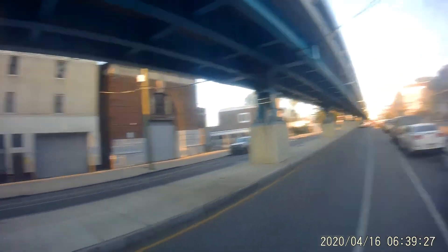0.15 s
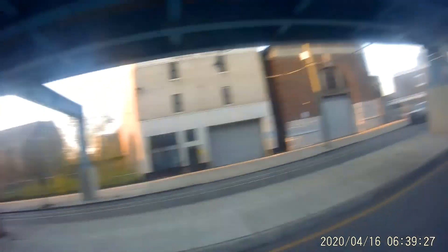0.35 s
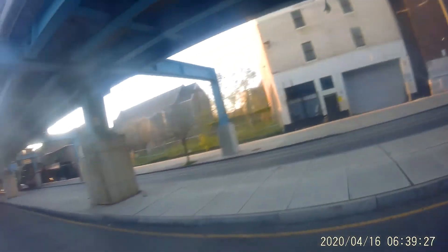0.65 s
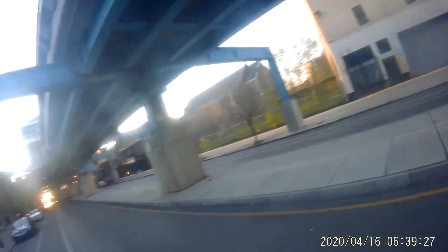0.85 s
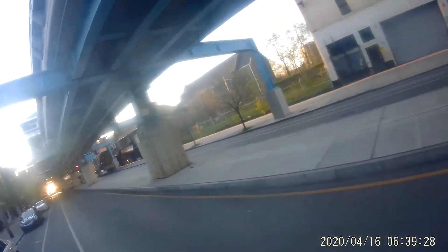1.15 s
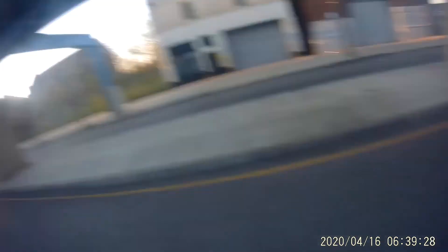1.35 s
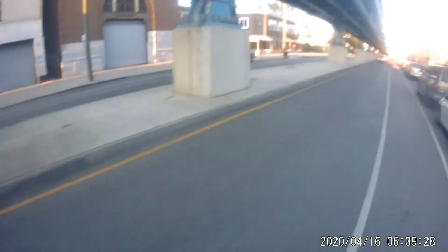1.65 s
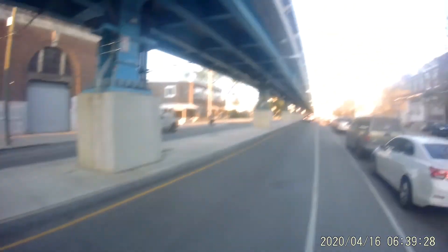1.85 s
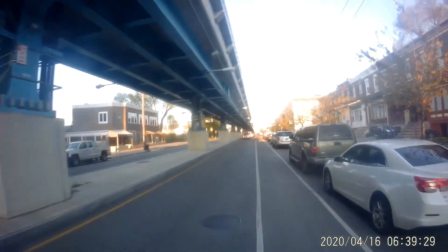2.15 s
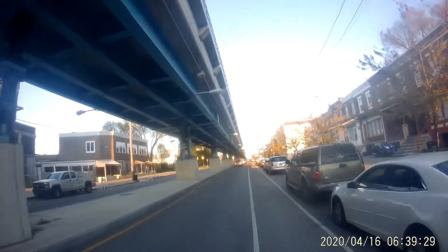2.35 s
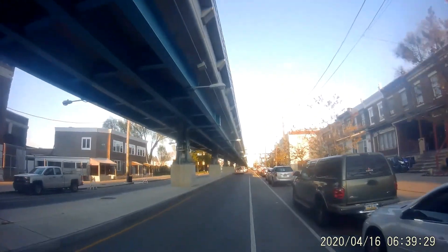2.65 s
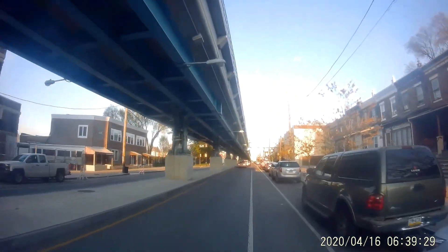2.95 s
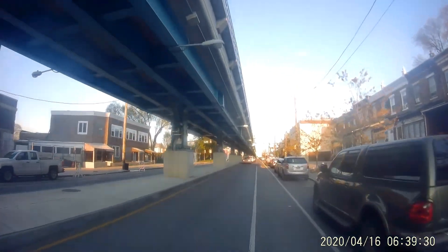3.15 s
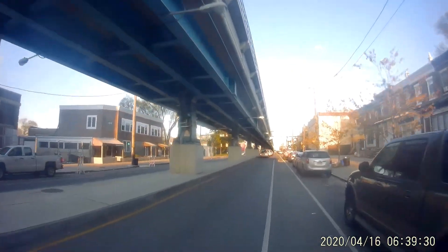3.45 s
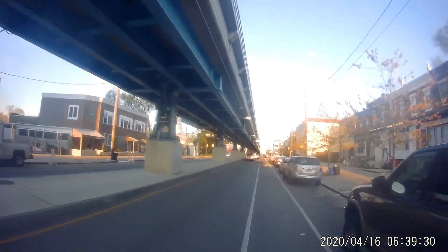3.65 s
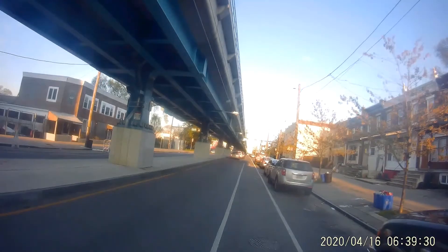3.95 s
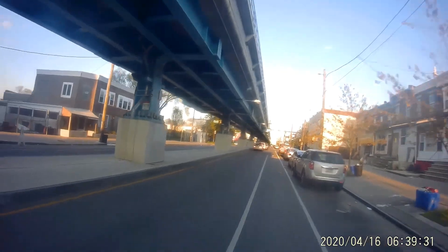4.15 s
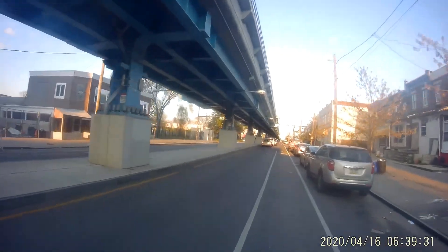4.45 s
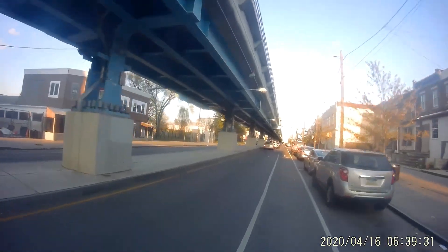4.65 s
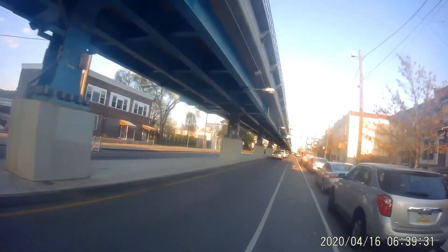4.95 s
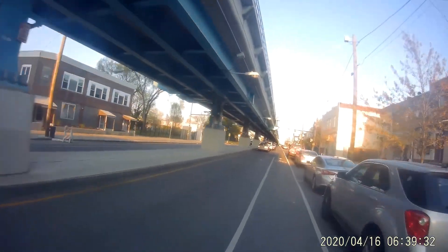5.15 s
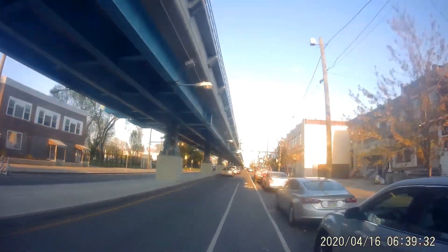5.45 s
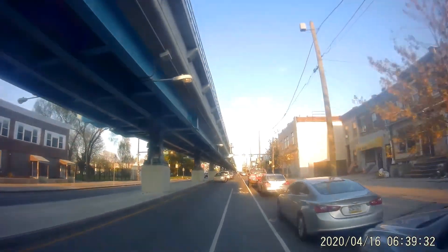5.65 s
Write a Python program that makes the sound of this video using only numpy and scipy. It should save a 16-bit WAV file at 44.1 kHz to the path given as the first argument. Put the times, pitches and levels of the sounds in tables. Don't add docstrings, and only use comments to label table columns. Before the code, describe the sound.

A helmet camera close to a motorized bicycle catches wind buffeting and tyre noise, then a small engine quickly swelling up. Its slow slapping beats quicken to a metallic, raspy drone with fin rattle and hiss. One short thump comes halfway, followed by uneven tugs and thin high chirps; then it speeds up, eases briefly and surges again on the open street. The treble is gritty and occasionally drops out.

```python
import sys
import numpy as np
from scipy import signal
from scipy.fft import rfft, irfft, next_fast_len
from scipy.io import wavfile
from scipy.ndimage import uniform_filter1d, map_coordinates

SR = 44100
rng = np.random.default_rng(int(sys.argv[2]) if len(sys.argv) > 2 else 0)


def invert_db(level):
    return 10 ** (np.asarray(level, dtype=float) / 20)


def unload_wav(signal):
    wavfile.write(
        sys.argv[1],
        SR,
        np.round(np.clip(np.atleast_2d(signal).T, -1, 1) * 32767).astype(np.int16),
    )


N = 255780
T = np.arange(N) / SR
CRUISE_HZ = 43.7

# time_s, turns_per_s
CRANK = [(0.0, 27.01), (0.5, 32.19), (0.64, 29.73), (0.71, 29.29), (1.25, 32.95), (1.38, 34.87),
         (1.86, 40.02), (2.52, 42.26), (2.84, 41.84), (3.08, 44.56), (3.46, 45.44), (3.77, 49.56),
         (4.09, 50.59), (4.62, 56.18), (4.86, 54.42), (5.12, 56.89), (5.31, 55.07), (5.8, 58.34)]
# pitch_hz, width_hz, level_db
PIPE_RINGING = [(775, 167, -4), (1001, 79, -4.5), (1250, 175, -5.5), (1610, 64, -1), (1667, 130, -4.5),
                (2043, 110, -10)]
# pitch_hz, width_hz, level_db
UPPER_FINS = [(4400, 810, 0), (5320, 600, -3.5)]
FADE_IN = 0.1837, 0.3747, -27.5, -12.5, -18
# time_s, half_length_s, lowest_lost_hz
DROPOUTS = [(0.233, 0.0097, 3420), (.359, 0.0049, 5000), (0.783, 0.004, 7000), (0.807, 0.006, 5060),
            (.999, 0.0045, 5470), (1.085, 0.0058, 4800), (1.141, 0.018, 4070), (2.05, 0.0057, 5500),
            (2.664, 0.0058, 4500), (3.535, 0.0049, 4000), (4.284, 0.0064, 5400), (4.563, 0.0045, 6000),
            (4.673, 0.0059, 6850), (5.194, 0.017, 5220)]


def unit(x):
    return x / np.sqrt(np.mean(x ** 2) + 1e-20)


def curves(rows):
    s, *cols = np.transpose(rows)
    return [np.interp(T, s, c) for c in cols]


def bump(at_s, half_s, power=2):
    return np.exp(-((T - at_s) / half_s) ** power)


def steady(x, span):
    return x / np.sqrt(np.abs(uniform_filter1d(x ** 2, int(span * SR))) + 1e-12)


def wobble(rate):
    return map_coordinates(rng.standard_normal(int(N * rate / SR) + 4), [T * rate])


def later(x, s):
    return np.pad(x, (round(s * SR), 0))[:N]


def filtered(x, response):
    m = next_fast_len(N + 8192)
    return irfft(rfft(x, m) * response(np.fft.rfftfreq(m, 1 / SR)), m)[:N]


def resonance(f, centre_hz, width_hz):
    damping = 1j * f * width_hz
    return damping / (centre_hz * centre_hz - f * f + damping)


def body(modes):
    return lambda f: sum((-1) ** k * invert_db(db) * resonance(f, c, w) for k, (c, w, db) in enumerate(modes))


def resonant(x, modes, lo_hz, hi_hz):
    edges = signal.butter(4, [lo_hz, hi_hz], "bandpass", fs=SR, output="sos")
    return unit(signal.sosfilt(edges, filtered(x, body(modes))))


def coloured(spectrum):
    hz, db = np.transpose(spectrum)
    return unit(filtered(rng.standard_normal(N), lambda f: invert_db(np.interp(np.log(f + 1), np.log(hz), db))))


def burst(turns, db, rise, decay, scatter_db):
    whole = np.floor(turns).astype(int)
    size = invert_db(db + scatter_db * rng.standard_normal(whole.max() + 2)[whole])
    since = (turns - whole) / curves(CRANK)[0]
    return 1 + size * (1 - np.exp(-since / rise)) * np.exp(-since / decay)


def blows(turns, delay, jitter, scatter_db):
    at = np.flatnonzero(np.diff(np.floor(turns)) > 0)
    chance = rng.standard_normal((len(at), 2))
    where = np.clip(at + SR * (delay + jitter * chance[:, 0]), 0, N - 1).astype(int)
    return unit(np.bincount(where, invert_db(scatter_db * chance[:, 1]), N))


def knocks(events, modes, lo_hz, hi_hz, decay, over_db):
    first_blow = 50
    s, db = np.transpose(events)
    t = np.arange(300) / SR
    spray = unit(rng.standard_normal((len(s), len(t))) * np.exp(-t / decay)) - first_blow * (t == 0)
    where = (s[:, None] * SR).astype(int) + np.arange(len(t))
    struck = np.bincount(where.ravel(), (spray * invert_db(db)[:, None]).ravel(), N)
    rung = resonant(struck, modes, lo_hz, hi_hz)
    return rung / np.abs(rung).max() * invert_db(db.max() + over_db)


def wind(shut):
    # pitch_hz, level_db_per_hz
    buffet_colour = [(4, -23), (14, 7.5), (35, 1), (70, -4), (130, -51), (300, -49)]
    # pitch_hz, level_db_per_hz
    road_colour = [(50, -22), (90, 7), (150, 1.5), (250, -2), (600, -1), (1300, -21), (2500, -27.5),
                   (4000, -38.5), (15000, -32)]
    # time_s, level_db, half_length_s
    gusts = [
        (0.493, -4, 0.16),
        (1.117, 2, 0.33),
        (2.35, 0, 0.18),
        (2.89, 7.5, 0.071),
        (4.71, 7, 0.053),
        (5.042, 5.5, 0.075),
        (5.8, 3, 0.1),
    ]
    *_, buffet_from_db, road_from_db = FADE_IN
    buffet_db = -46.5 + sum(db * bump(s, half) for s, db, half in gusts)
    road_db = -48 + 5 * np.log2(curves(CRANK)[0] / CRUISE_HZ)
    buffet = invert_db(buffet_db + buffet_from_db * shut + 1.1 * wobble(8.4)) * coloured(buffet_colour)
    road = invert_db(road_db + road_from_db * shut + 2.6 * wobble(13)) * coloured(road_colour)
    return buffet + road


def laws(speed, throttle):
    # resting_db, full_throttle_db, lugging_db, db_per_octave_of_speed
    part_laws = [(-6.5, -3.5, -1, -0.5), (-22, 9, 1.1, 5.6), (-33.5, 4.5, 3, -1.7), (-30, 18, 24, -3.5),
                 (-14.5, 6.5, -9.5, -0.2), (-2.5, 13, 7, 0.5), (8, -21, 1, 11), (-8, 0, 1, 0.5),
                 (-10, 2.5, -6.5, -4.8), (-18, 13, -8, -4), (-26, 0, 14, -20), (-18, 12, -6, 0),
                 (0, -3, 4.5, 0)]
    lugs_below_hz, lug_fade_hz = 38.5, 4.4
    lugging = np.clip((lugs_below_hz - speed) / lug_fade_hz, 0, 1)
    return np.array(part_laws) @ [np.ones(N), throttle, lugging, np.log2(speed / CRUISE_HZ)]


def exhaust(firing, ring_db):
    # pitch_hz, width_hz, level_db
    chamber = [(406, 200, 0)]
    # pitch_hz, width_hz, level_db
    tail_mode = [(461, 45, 0)]

    def swell(f):
        return -np.abs(body(chamber)(f)) / (1 + (284 / (f + 1)) ** 16) / (1 + (f / 560) ** 12)

    puffs = later(firing, .0042)
    gas = puffs + .55 * rng.standard_normal(N)
    ring = unit(filtered(gas, lambda f: -np.abs(body(tail_mode)(f)) ** 2))
    thud = unit(filtered(puffs + .27 * rng.standard_normal(N), swell))
    return thud + invert_db(ring_db) * ring


def casing(port, firing, flare_db, edge_db, bells_db, knock_db):
    # pitch_hz, width_hz, level_db
    pipe_modes = [(788, 148, 0.5), (1322, 255, 2), (1995, 350, -7.5)]
    # pitch_hz, width_hz, level_db
    edge_modes = [(2247, 100, 7), (2710, 250, -10)]
    # pitch_hz, width_hz, level_db
    bell_modes = [
        (1270, 110, 0),
        (2075, 120, 0),
        (1512, 80, 0),
        (1345, 100, 0),
    ]
    round_trip_s, echo_db = .00395, -4.5
    echoes = sum(invert_db(k * echo_db) * later(firing, .0013 + k * round_trip_s) for k in range(4))
    blow = -resonant(echoes, pipe_modes, lo_hz=603, hi_hz=2350)
    flare = burst(port - .05, flare_db, rise=.001, decay=0.0022, scatter_db=5.5)
    drive = unit(flare * rng.standard_normal(N))
    edge = resonant(drive, edge_modes, lo_hz=2200, hi_hz=3050)
    bark = resonant(drive, PIPE_RINGING, lo_hz=618, hi_hz=2260)
    struck = drive - .8 * later(firing, .0013)
    bells = sum(invert_db(db) * unit(filtered(struck, lambda f: body([bell])(f) ** 2))
                for db, bell in zip(bells_db, bell_modes))
    return bark + invert_db(knock_db) * blow + invert_db(edge_db) * edge + bells


def fin_rattle(slap, rasp_db):
    # pitch_hz, width_hz, level_db
    fin_modes = [(3090, 360, 0), (3378, 102, 7.5), (3710, 286, 3.5), (4800, 130, 1.5), (5025, 530, -7)]
    buzz = resonant(slap * rng.standard_normal(N), fin_modes, lo_hz=2630, hi_hz=6560)
    rasp = resonant(slap * rng.standard_normal(N), UPPER_FINS, lo_hz=3800, hi_hz=6630)
    return buzz + invert_db(rasp_db) * rasp


def engine_hiss(slap, slap_db):
    # pitch_hz, level_db_per_hz
    hiss_colour = [(3240, -70), (5500, -2), (6690, -5), (9430, -11), (10200, -6), (10700, -5), (12100, -11),
                   (13500, -9.5), (14300, -9), (14500, -26), (15600, -37)]
    depth = 0.98 * np.clip(slap_db / 10, 0, 1) ** 2
    return slap ** depth * invert_db(2.0 * wobble(14)) * coloured(hiss_colour)


def frame_hum(speed, turns, level_db):
    order_lead = [1, -.5, -1.5]
    # pitch_hz, level_db
    frame_answer = [(30, -18.5), (45, -34.5), (65, -32), (85, -20.5), (108, -12.5), (125, -22.5),
                    (150, -26), (175, -37)]
    # shaft_order, time_s, level_db, half_length_s
    rider_shifts = [
        (3, 0.44, 9, 0.14),
        (1, 1.03, 11.5, 0.18),
        (2, 2.22, 4.5, 0.18),
        (2, 4.55, 6.5, 0.14),
        (3, 3.85, -6, 0.18),
    ]
    hz, answer_db = np.transpose(frame_answer)
    hum = 0
    for k, order_db in enumerate([2.5, -2.5, -1.5]):
        swell_db = sum(db * bump(s, half) for order, s, db, half in rider_shifts if round(order) == k + 1)
        frame_db = np.interp((k + 1) * speed, hz, answer_db)
        gain = invert_db(order_db + swell_db + frame_db + 2.2 * wobble(9))
        hum = hum + gain * np.cos(2 * np.pi * (k + 1) * turns + order_lead[k])
    return invert_db(-25.5 + 0.9 * (level_db + 29.5)) * hum


def engine():
    # time_s, casing_level_db, throttle_0_to_1
    rider_hand = [(0, -47, 0.7), (.38, -37, 0.44), (.75, -33.5, 0.6), (1.05, -31.5, 0.64), (1.5, -30, 0.73),
                  (1.72, -30.5, 0.45), (1.88, -28.5, 0.35), (2.38, -29, 0.2), (2.62, -27, 0.27),
                  (2.88, -30, 0.13), (3.25, -27, 0.55), (3.5, -26.5, 0.34), (3.75, -24, 0.66),
                  (4.25, -25, 0.68), (4.88, -27.5, 0.5), (5.05, -33, 0), (5.35, -31, 0), (5.8, -23, 0.71)]
    # time_s, ahead_turns, half_length_s
    snatches = [
        (3.05, .065, .05),
        (3.2, .028, .022),
        (3.29, .035, .035),
        (3.48, .04, .025),
    ]
    ring_hush = 3.38, 0.23, -9
    bell_tuning = 39.5, 1.8, 11.6

    speed = curves(CRANK)[0]
    level_db, throttle = curves(rider_hand)
    snatch = sum(ahead * bump(s, half) for s, ahead, half in snatches)
    turns = .59 + np.cumsum(speed) / SR + snatch + .004 * wobble(14)
    port = turns + .0045 * speed
    (silencer_db, fins_db, hiss_db, flare_db, edge_db, slap_db, ring_db,
     bell_db, head_db, rasp_db, case_db, upper_db, knock_db) = laws(speed, throttle)

    hush_s, hush_half_s, hush_db = ring_hush
    ring_db = ring_db + hush_db * bump(hush_s, hush_half_s, power=4)
    tuned_hz, tuned_width_hz, sings_db = bell_tuning
    bell_db = bell_db + sings_db * np.exp(-((speed - tuned_hz) / tuned_width_hz) ** 2)
    bells_db = bell_db, head_db, case_db, upper_db

    firing = blows(port, 0, jitter=.0001, scatter_db=1.2)
    lag = np.where(speed < 37, .07, .47 - .022 * (speed - CRUISE_HZ))
    slap = burst(port + 1 - lag, slap_db, rise=0.00043, decay=0.0017, scatter_db=3.0)

    layers = [(silencer_db, exhaust(firing, ring_db)),
              (0, casing(port, firing, flare_db, edge_db, bells_db, knock_db)),
              (fins_db, fin_rattle(slap, rasp_db)),
              (hiss_db, engine_hiss(slap, slap_db))]
    motor = sum(invert_db(db) * steady(x, span=0.224) for db, x in layers)
    return invert_db(level_db) * motor + frame_hum(speed, turns, level_db)


def hard_firings():
    # time_s, peak_db
    hard = [(0.229, -32), (0.259, -25), (0.362, -17), (0.418, -16), (0.483, -19), (0.58, -27), (0.614, -14),
            (0.947, -19), (0.978, -19), (1.011, -8), (1.228, -19), (1.318, -21), (1.348, -6.5), (1.407, -9),
            (1.435, -5), (1.462, -7.5), (3.01, -26), (3.75, -8), (4.723, -1), (4.774, -3), (4.868, -1),
            (5.066, -9.5), (5.228, -6.5), (5.297, -6.5)]
    # time_s, peak_db
    ticks = [(3.6966, -39), (3.7171, -35), (3.7365, -35), (3.757, -41), (3.8029, -42), (3.9171, -28),
             (3.958, -27), (3.9969, -26.5), (4.0368, -31), (4.0957, -30), (4.1546, -31), (4.1935, -36),
             (4.2129, -34), (4.2319, -34.5), (4.2509, -32), (4.2698, -39), (4.4344, -44), (5.7095, -41),
             (5.7455, -27), (5.7629, -29)]
    return (knocks(hard, PIPE_RINGING[2:], lo_hz=890, hi_hz=2300, decay=.002, over_db=-15)
            + knocks(ticks, UPPER_FINS, lo_hz=4220, hi_hz=5530, decay=.0012, over_db=3))


def chain():
    # start_s, end_s, level_db
    whistles = [
        (2.68, 2.79, -61),
        (3.117, 3.236, -61),
        (3.49, 3.733, -62),
        (3.876, 4.04, -66),
        (4.403, 4.64, -63),
        (4.826, 4.955, -62),
    ]
    # pitch_hz, level_db
    tones = [(13867, 0), (10406, -4)]
    on = sum(invert_db(db) * np.clip(np.minimum(T - a, b - T) / 0.016, 0, 1) for a, b, db in whistles)
    return on * sum(invert_db(db + 3.1 * wobble(40)) * np.sin(2 * np.pi * hz * T + 1.7 * wobble(60))
                    for hz, db in tones)


def jolt():
    # time_s, pitch_hz, peak_db, half_length_s, lead_turns
    swings = [
        (2.98, 20, -25, .022, 0),
        (2.9715, 125, -26, .007, .25),
    ]
    return sum(invert_db(db) * bump(s, half) * np.sin(2 * np.pi * (hz * (T - s) + lead))
               for s, hz, db, half, lead in swings)


def scene():
    # pitch_hz, width_hz, depth_0_to_1
    hollows = [(588, 390, 0.36), (909, 79, 0.58)]

    def housing(f):
        return np.prod([1 - np.clip(d, 0, 1) * resonance(f, c, w) for c, w, d in hollows], axis=0)

    amplifier = invert_db(-69.5) * rng.standard_normal(N)
    start_s, end_s, engine_from_db = FADE_IN[:3]
    shut = np.clip((end_s - T) / (end_s - start_s), 0, 1) ** 2.2
    motor = filtered(invert_db(engine_from_db * shut) * engine() + hard_firings(), housing)
    return (motor + wind(shut) + chain() + jolt() + amplifier)[None]


def thinned(x):
    # pitch_hz, share_of_time_0_to_1
    empty_bands = [(6800, 0), (8000, .05), (9400, .12), (11000, .03), (12000, .07), (13600, .03),
                   (14100, .1), (14300, .55), (14600, .15), (15600, .4)]
    hz, s, z = signal.stft(x, SR, nperseg=1536, noverlap=1024)
    local = np.sqrt(uniform_filter1d(np.abs(z) ** 2, size=41, axis=0) + 1e-20)
    dropped = sum(np.abs(s - at) < half for at, half, _ in DROPOUTS if half > .0045)
    bar = np.interp(hz, [2900, 3300, 9000], [0, .35, .85])[:, None]
    bar = bar + 1.05 * np.interp(hz, [400, 2300, 2500], [.5, .5, 1])[:, None] * dropped
    chance = uniform_filter1d(rng.standard_normal((len(hz) // 10 + 1, len(s))), size=6, axis=1)
    rank = chance.argsort(axis=1).argsort(axis=1)[np.arange(len(hz)) // 10] / len(s)
    filled = rank >= np.interp(hz, *np.transpose(empty_bands))[:, None]
    kept = (np.abs(z) > bar * local) & filled
    return signal.istft(z * kept, SR, nperseg=1536, noverlap=1024)[1][:N]


def treble_dropouts(x):
    hz, s, z = signal.stft(x, SR, nperseg=256, noverlap=192)
    for at, half, lo_hz in DROPOUTS:
        lost = np.clip((half - np.abs(s - at)) / .008 + .3, 0, 1)
        z = z * (1 - (hz[:, None] > lo_hz) * lost)
    return signal.istft(z, SR, nperseg=256, noverlap=192)[1][:N]


def roll_off(x):
    return signal.sosfilt(signal.butter(12, 15700, fs=SR, output="sos"), x)


def record(dry):
    mix = treble_dropouts(thinned(dry[0]))[None]
    return roll_off(mix)


dry = scene()
out = record(dry)
unload_wav(out)
```